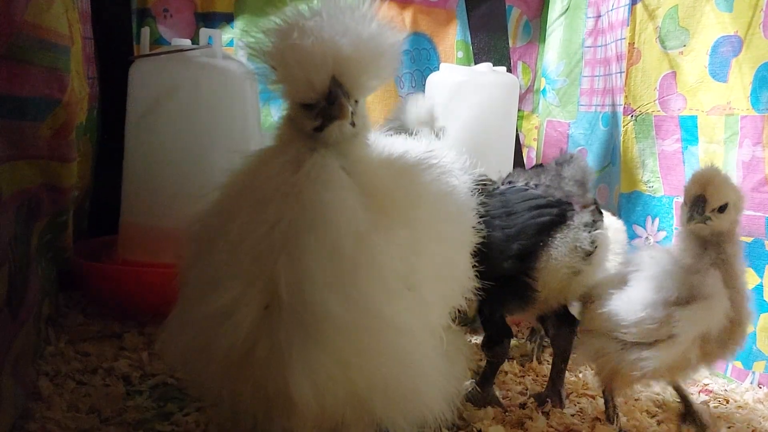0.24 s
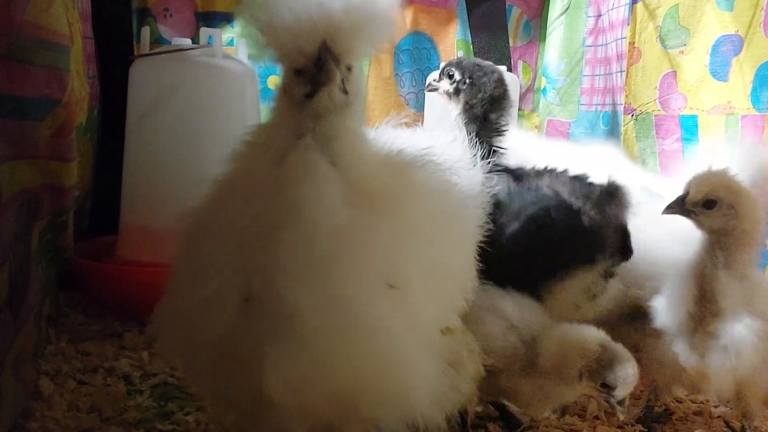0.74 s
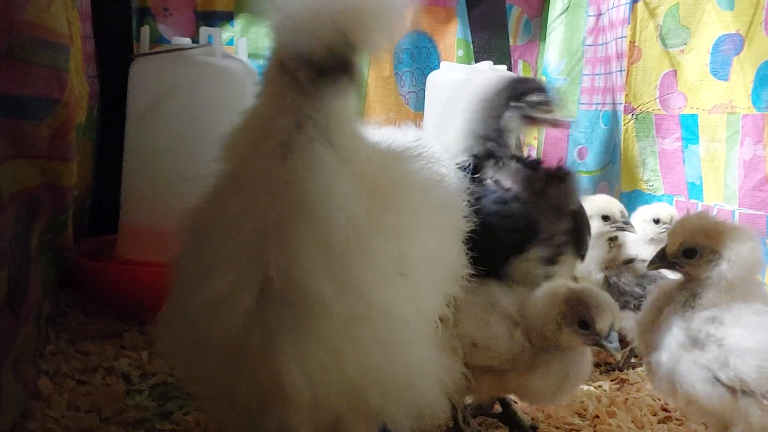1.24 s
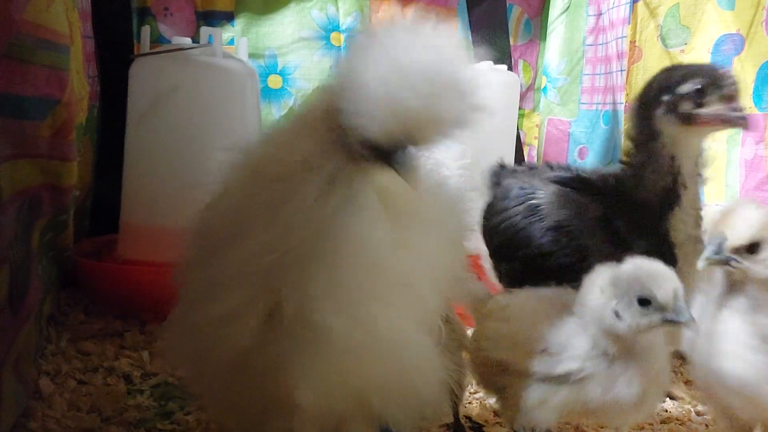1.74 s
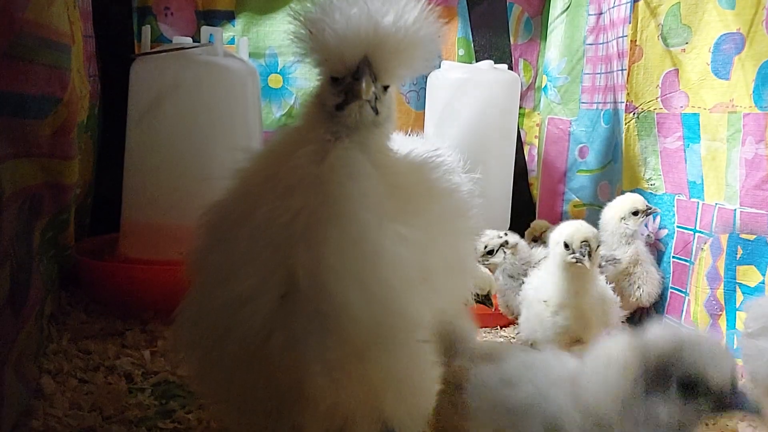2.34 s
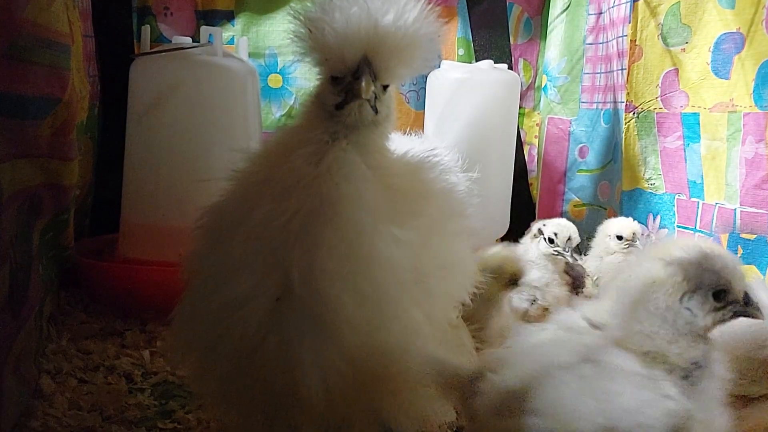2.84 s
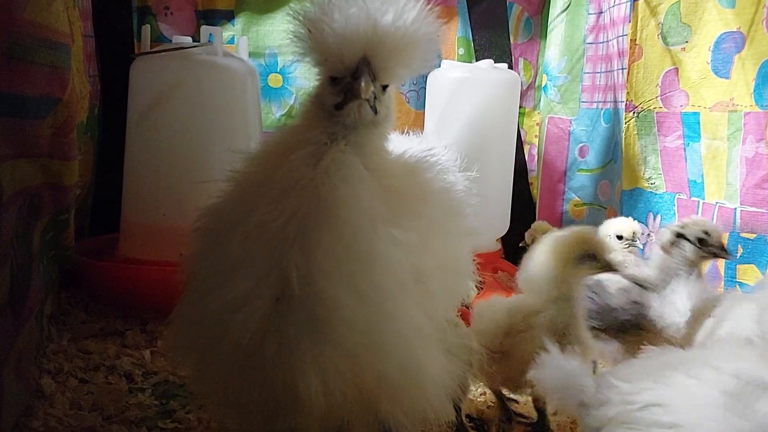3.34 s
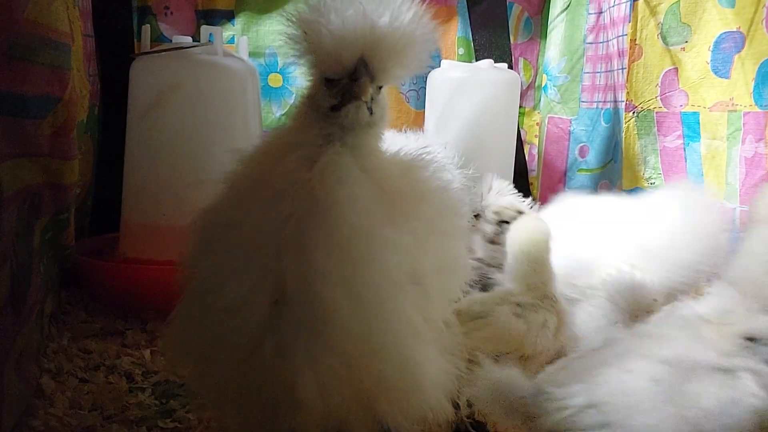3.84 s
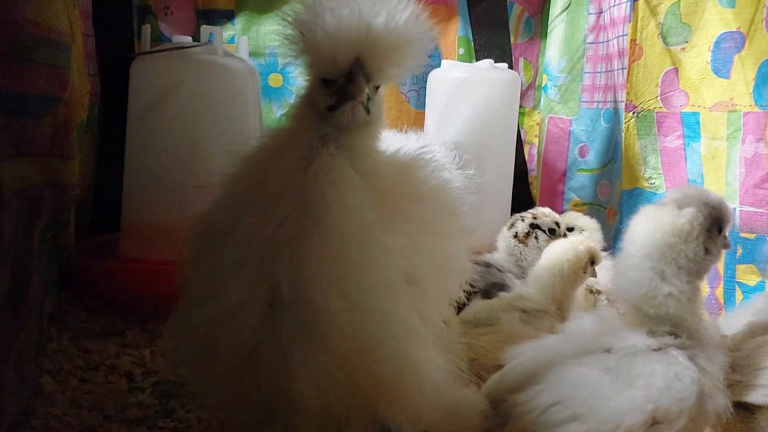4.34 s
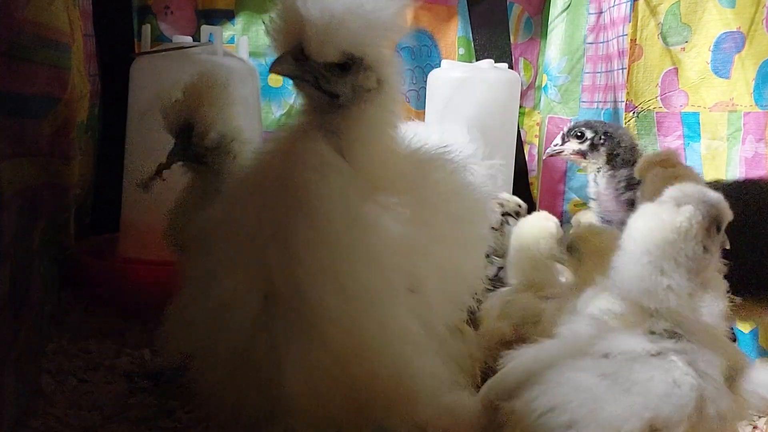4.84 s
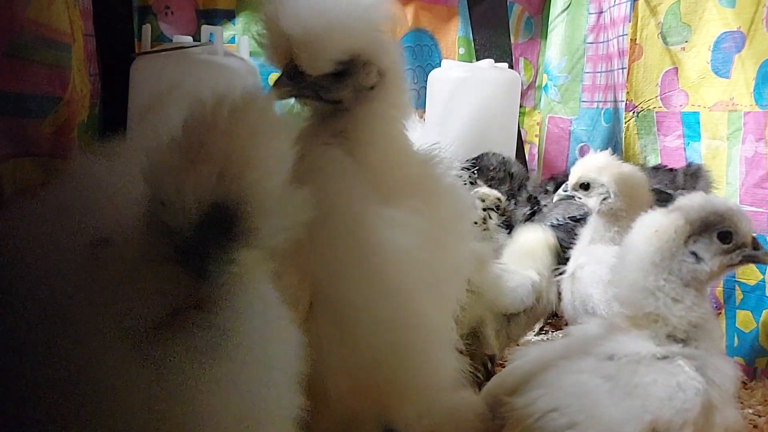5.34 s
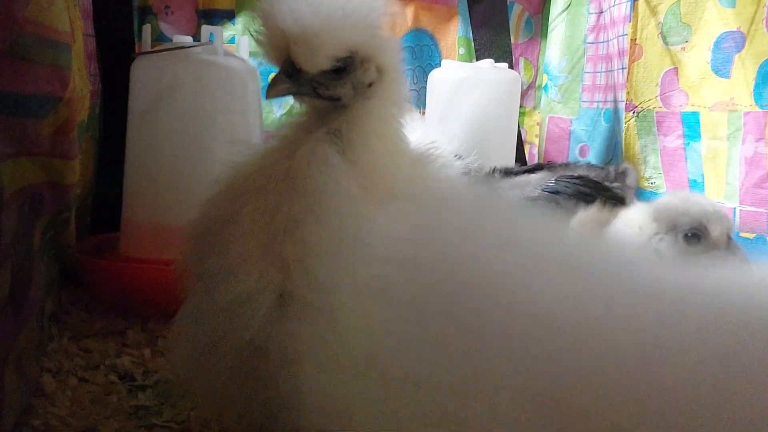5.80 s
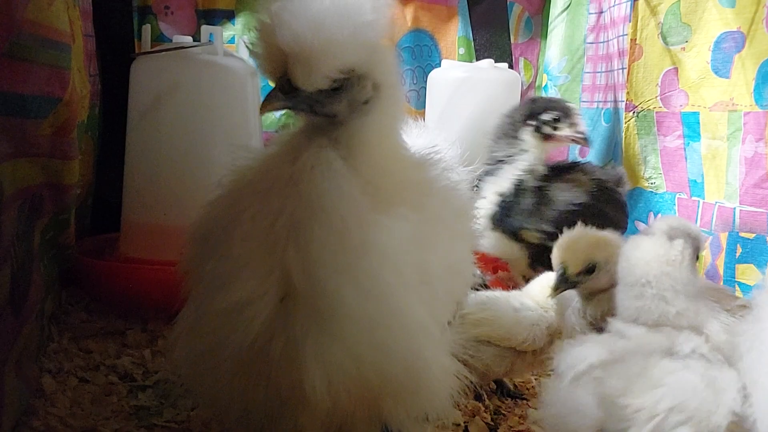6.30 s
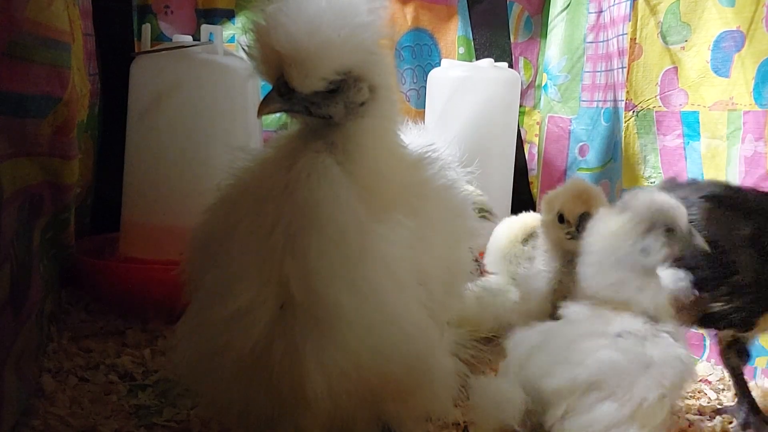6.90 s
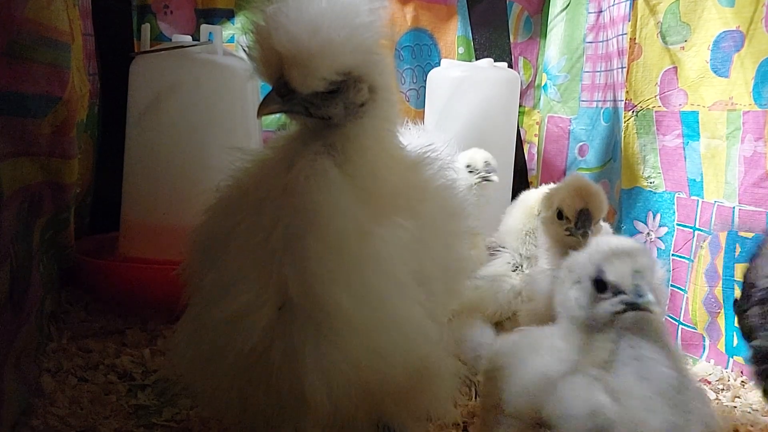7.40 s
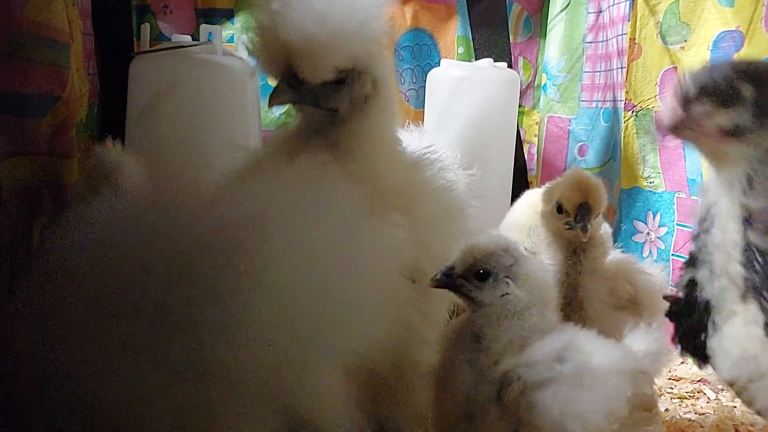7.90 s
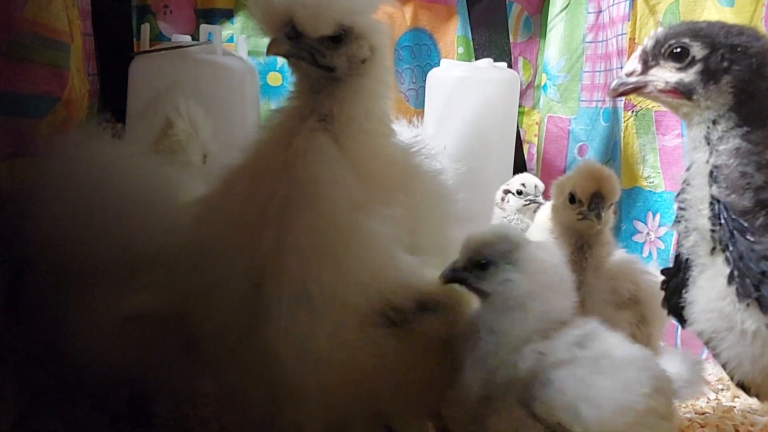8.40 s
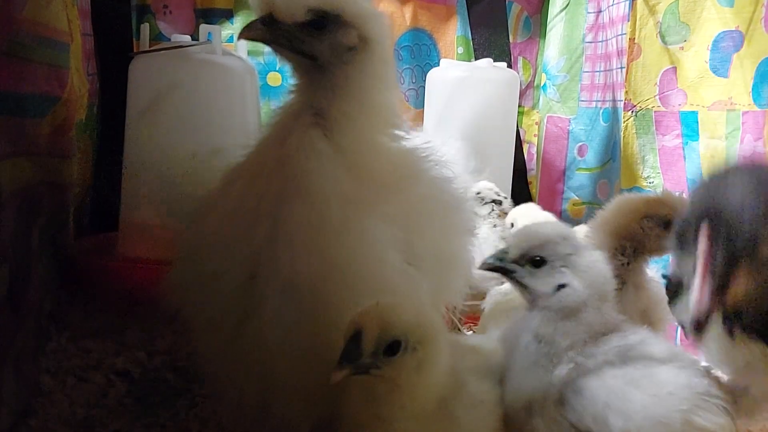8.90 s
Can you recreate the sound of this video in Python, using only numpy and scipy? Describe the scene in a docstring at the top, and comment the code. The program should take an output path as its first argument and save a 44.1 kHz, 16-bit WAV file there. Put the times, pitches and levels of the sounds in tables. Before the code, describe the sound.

A brood of chicks peeps and shuffles near the microphone in a cloth-walled pen with almost no echo. Low bumps and scratchy rustles of shavings run under the high calls, soon joined by an older chick's repeated raspy, falling cry. A few quick trills sound about halfway through. Late on the peeping stops for a moment, then comes back in a softer flurry around the last cry.

```python
"""A brood of chicks in a small cloth-walled pen bedded with wood shavings.
From the start, small chicks whistle arched peeps and soft chirps; feet thump, shavings and feathers rustle.
From 1 s an older chick repeats a hoarse falling cry that cracks downward at its end.
Four short trills come around 5 s, and the footfalls grow lighter. The peeps pause from 6.7 to 8 s,
then return in a quieter flurry around the last cry as the shuffling dies down."""
import sys
import numpy as np
from scipy import signal
from scipy.io import wavfile
from scipy.ndimage import uniform_filter1d

SR = 44100
rng = np.random.default_rng(int(sys.argv[2]) if len(sys.argv) > 2 else 0)


def unload_audio(sound):
    """Save the sound as a 16-bit wav file, at the path given as the first command line argument."""
    columns = np.transpose(np.atleast_2d(sound))
    # keep every value between -1 and 1, then stretch to whole-number steps
    steps = np.round(np.clip(columns, -1, 1) * 32767)
    wavfile.write(sys.argv[1], SR, steps.astype(np.int16))


N = 403515
TIME = np.arange(N) / SR


def from_db(db):
    return 10 ** (np.asarray(db) / 20)


def unit_rms(x):
    return x / np.sqrt(np.mean(x ** 2) + 1e-20)


def at_hz(points, hz):
    """Interpolate on a log-frequency axis."""
    points = np.array(points)
    return np.interp(np.log(hz), np.log(points[:, 0]), points[:, 1])


def bandpass(x, low_hz, high_hz, order):
    return signal.sosfilt(signal.butter(order, [low_hz, high_hz], "band", fs=SR, output="sos"), x)


def hiss_band(low_hz, high_hz, size):
    return unit_rms(bandpass(rng.standard_normal(size), low_hz, high_hz, order=4))


def drift(hz, size):
    """Random wander slower than hz, rms 1."""
    pole = np.exp(-2 * np.pi * hz / SR)
    run_in = SR // 12
    wander = signal.lfilter([1], [1, -2 * pole, pole * pole], rng.standard_normal(size + run_in))
    return unit_rms(wander[run_in:])


def glide(t, times, values, round_s):
    """Line segments with rounded corners."""
    return uniform_filter1d(np.interp(t, times, values), max(1, int(round_s * SR)), mode="nearest")


def fade(t, edge_s):
    """Sine-squared fade at both ends."""
    return np.sin(np.pi / 2 * np.clip(np.minimum(t - t[0], t[-1] - t) / edge_s, 0, 1)) ** 2


def add(out, start_s, sound, pan_db=0, delay_ms=0):
    """Mix into stereo. pan_db: left over right; delay_ms: lag of the right ear."""
    lean = from_db(pan_db)
    pair = np.array([lean * sound, sound]) * np.sqrt(2 / (1 + lean ** 2))
    left = max(0, round(start_s * SR))
    right = max(0, left + round(delay_ms * SR / 1000))
    for ear, at in enumerate((left, right)):
        out[ear, at:at + len(sound)] += pair[ear, :max(0, N - at)]


def pen_reverb(x, t60_s=.18):
    """Short diffuse tail from the soft walls, different at each ear."""
    t = np.arange(SR // 3) / SR
    tail = rng.standard_normal((2, len(t))) * from_db(-60 * t / t60_s) * (t > .003)
    tail = bandpass(tail, 300, 9000, order=1)
    tail = tail / np.sqrt(np.sum(tail ** 2, axis=1, keepdims=True))
    return signal.fftconvolve(x.mean(axis=0)[None], tail, axes=1)[:, :N]


def banded_noise(spectrum, flicker_db, flicker_hz):
    """Half-octave bands of stereo noise that flicker partly together; rms 1."""
    # left-right likeness: freq_hz, correlation
    likeness = [(50, 0.97), (150, 0.96), (300, 0.76), (800, 0), (3000, 0), (12000, 0.073)]
    out, together = 0, drift(flicker_hz, N)
    edges_hz = 22 * 2 ** np.arange(0, 9.6, .5)
    white = rng.standard_normal((2, 2, N))
    for k, (low_hz, high_hz) in enumerate(zip(edges_hz, edges_hz[1:])):
        hz = np.sqrt(low_hz * high_hz)
        if spectrum[0][0] / 2 < hz < spectrum[-1][0] * 2:
            mid, side = bandpass(white[k % 2], low_hz, high_hz, order=2)
            alike = at_hz(likeness, hz)
            gain = from_db(at_hz(spectrum, hz) + flicker_db * (together + .5 * drift(flicker_hz, N)))
            out = out + gain * (np.sqrt(1 + alike) * mid + np.sqrt(1 - alike) * side * [[1], [-1]])
    return unit_rms(out)


def floor_rumble(gain_db):
    """Many small shuffling feet keep the floor rumbling."""
    # rumble envelope: time_s, level_db
    envelope = [(0, -33.5), (0.6, -34.5), (1.3, -37.5), (2.0, -36), (2.7, -42), (3.2, -43.5), (4.3, -40),
                (5.2, -38.5), (6.15, -49.5), (6.95, -38.5), (7.2, -47.5), (7.5, -37), (8.1, -49.5),
                (9.15, -50)]
    # rumble spectrum: freq_hz, density_db
    spectrum = [(25, -33), (40, -16.5), (58, 9.5), (80, 1), (115, -0.5), (160, -5.5), (220, -10.5),
                (310, -22), (520, -23), (900, -28.5), (1600, -42), (4000, -67)]
    level = from_db(np.interp(TIME, *np.transpose(envelope)) + gain_db)
    return level * banded_noise(spectrum, flicker_db=4.0, flicker_hz=13.4)


def scratch_envelope(attack_s=.0063):
    """Each scratch in the shavings rises quickly and fades."""
    # scratches: peak_s, decay_s, level_db
    scratches = [(.87, .03, -53.5), (1.246, 0.02, -47.5), (1.638, 0.097, -48), (2.086, 0.019, -44.5),
                 (2.147, 0.013, -38), (2.232, 0.022, -48.5), (2.34, 0.015, -51), (2.412, 0.028, -48),
                 (2.56, 0.064, -49), (2.798, 0.065, -48), (3.215, 0.067, -65), (3.42, 0.04, -47.5),
                 (3.555, 0.0087, -59), (3.70, .025, -55), (4.599, 0.21, -53.5), (4.79, 0.035, -45.5),
                 (5.37, 0.0057, -54.5), (5.46, 0.064, -59.5), (5.954, 0.022, -53), (6.275, 0.021, -86.5),
                 (6.40, 0.09, -53), (6.647, 0.034, -44), (6.89, 0.049, -54.5), (7.459, 0.17, -51),
                 (7.723, 0.02, -55), (8.26, 0.041, -56.5), (8.489, 0.026, -56.5), (8.635, 0.034, -61.5)]
    t, power = np.arange(0, N / SR, .001), 0
    for peak_s, decay_s, db in scratches:
        falloff = np.maximum((peak_s - t) / attack_s, (t - peak_s) / decay_s)
        power = power + from_db(db) ** 2 * np.exp(-2 * falloff)
    return np.interp(TIME, t, np.sqrt(power))


def rustle(stir_db, scratch_db, crackle_db, ticks_per_s=110, tick_s=.0006):
    """Shavings and feathers hiss and tick as the birds stir and scratch."""
    # steady stirring: time_s, level_db
    envelope = [(0.0, -59), (0.51, -64.5), (1.53, -57.5), (2.75, -58.5), (3.06, -68), (3.36, -58),
                (4.87, -63), (5.09, -66), (5.53, -56.5), (6.14, -68), (6.62, -58), (7.21, -66), (7.57, -61),
                (7.85, -63.5), (7.95, -64), (9.15, -75)]
    # hiss spectrum: freq_hz, density_db
    spectrum = [(300, -5.5), (800, -2.5), (1600, -1), (3500, 1), (6000, 1), (8000, -4.5), (10000, -16),
                (12500, 2.5), (15500, 2.5)]
    hiss = banded_noise(spectrum, flicker_db=3.05, flicker_hz=34.7)
    snaps = (rng.random(N) < ticks_per_s / SR) * from_db(5 * np.minimum(rng.exponential(1, N), 3))
    decays = signal.lfilter([1], [1, -np.exp(-1 / (tick_s * SR))], snaps + 1e-18)
    ticks = unit_rms(decays * rng.standard_normal((2, N)))
    stir = from_db(np.interp(TIME, *np.transpose(envelope)) + stir_db)
    level = np.hypot(stir, from_db(scratch_db) * scratch_envelope())
    return level * (hiss + from_db(crackle_db) * ticks)


def footfalls(gain_db, crunch_db=-11, crunch_s=.013):
    """A foot sets the floor ringing, low modes building last, and crushes some shavings."""
    # steps: time_s, thud_db, knock_db, tap_db
    steps = [(0.183, -26, -35, -36.5), (.312, -41, -33, -35.5), (0.45, -25, -22, -32.5),
             (0.863, -18.5, -21.5, -43), (0.913, -22, -30.5, -39), (1.045, -18, -33, -52),
             (1.551, -20, -24, -50), (1.722, -26.5, -21.5, -38), (2.087, -18, -22.5, -28.5),
             (2.15, -18, -23, -41), (2.346, -18.5, -26, -50), (2.564, -19, -27, -43),
             (2.673, -14.5, -19, -37), (2.8, -23.5, -28, -52), (3.581, -20, -47, -35.5),
             (3.638, -17.5, -24, -32.5), (3.818, -18, -13.5, -38.5), (3.997, -31, -17, -41.5),
             (4.199, -16.5, -10, -25), (4.479, -64, -25, -92), (4.574, -43.5, -23, -46),
             (4.648, -17.5, -17, -23.5), (4.883, -36, -54, -31), (4.924, -42, -53, -30),
             (4.961, -28, -34, -48), (5.436, -28.5, -44, -38), (5.588, -33, -34.5, -28),
             (5.657, -27.5, -27, -52), (6.396, -21, -40, -58), (6.535, -19, -37.5, -52),
             (6.649, -21, -23, -47.5), (6.94, -29, -30.5, -35.5), (7.6, -51, -31.5, -38),
             (7.735, -36, -62, -57), (8.251, -26.5, -31, -46), (8.94, -29, -26.5, -27.5),
             (8.978, -36, -42, -38.5), (9.1, -57, -54.5, -47)]
    # thud, knock and tap bands: centre_hz
    bands_hz = [85, 230, 700]
    # pen floor modes: freq_hz, level_db, t60_s
    modes = [(64.9, -5.5, 0.36), (72, 0, 0.089), (114.8, 1.5, 0.12), (157, -7.5, 0.068), (217, 0, 0.084),
             (284, -10.5, 0.037), (390.5, -6, 0.086), (522, -6, 0.064), (686, -1.5, 0.047),
             (846, -4, 0.046), (1210, -7.5, 0.064)]
    out, t = np.zeros((2, N)), np.arange(SR // 4) / SR
    for time_s, thud_db, knock_db, tap_db in steps:
        start_s = time_s - .001
        force = list(zip(bands_hz, (thud_db, knock_db, tap_db)))
        for hz, db, t60_s in modes:
            mode_db = gain_db + db + at_hz(force, hz) + rng.normal(0, .44)
            age = t[t < t60_s]
            swing = np.sin(2 * np.pi * (hz * rng.normal(1, .043) * age + rng.random()))
            ring = from_db(mode_db - 60 * age / t60_s) * swing * (1 - np.exp(-2 * hz * age))
            pan_db, delay_ms = (5, .35) if hz > 250 else (1, 0)   # higher modes from the left
            add(out, start_s, ring, pan_db, delay_ms)
        age = t[t < 8 * crunch_s]
        for pan_db in (-12, 12):
            grains = rng.standard_normal(len(age)) * from_db(3 * drift(400, len(age)))
            crunch = 2 * bandpass(grains * np.exp(-age / crunch_s), 300, 1300, order=2)
            add(out, start_s, from_db(tap_db + crunch_db) * crunch, pan_db)
    return out


def syrinx(hz, overtones, overtone_db):
    """Vibrating membrane: nearly a sine, with weak overtones coloured by the beak."""
    # beak and throat response: freq_hz, gain_db
    beak = [(3000, 7), (4800, 6), (5800, 8), (7000, -3.5), (8000, -2.5), (9300, -2.5), (10500, -15),
            (12200, 3.5), (14500, -9)]
    phase = 2 * np.pi * np.cumsum(hz) / SR
    wave = np.sin(phase)
    for k, db in overtones:
        gain = from_db(db + overtone_db + at_hz(beak, k * hz)) * (k * hz < SR / 2)
        wave = wave + gain * np.sin(k * phase)
    return np.sqrt(2) * wave


def whistle(t, hz, db, overtone_db, jitter=.0007, shimmer_db=2.04, slack_jitter=.083, flutter_db=6):
    """Clear tone; as the pitch collapses, the slack membrane flutters and gains overtones."""
    # syrinx overtones: harmonic, level_db
    overtones = [(2, -34.5), (3, -64.5)]
    slack = np.clip((hz.max() - hz - 600) / 700, 0, 1) * (t > t[np.argmax(hz)])
    pitch_hz = hz * (1 + (jitter + slack_jitter * slack) * drift(300, len(t)))
    wave = syrinx(pitch_hz, overtones, overtone_db + 13 * slack)
    waver_db = shimmer_db * drift(73, len(t)) + flutter_db * slack * (drift(162, len(t)) / 2 - 1)
    return wave * from_db(db + waver_db - 2 * slack) * fade(t, .0016)


def chirps(gain_db):
    """Soft whistles that crest early and slide down."""
    # chirps: start_s, end_s, top_hz, last_hz, level_db, pan_db
    calls = [(0, 0.05, 2780, 2450, -51.5, 7), (0.295, 0.349, 4310, 3700, -45, 6),
             (0.778, 0.846, 4300, 3430, -52, 13), (0.947, 1.026, 2850, 2070, -50.5, 11),
             (0.967, 1.025, 4850, 4000, -53, 5), (1.318, 1.38, 2790, 2190, -48, -6),
             (1.83, 1.893, 2950, 2300, -57, 15), (2.006, 2.057, 3030, 2590, -39.5, 8),
             (3.914, 3.967, 3430, 2700, -46.5, 11), (4.056, 4.104, 3450, 2640, -44, 6),
             (5.752, 5.782, 3100, 2400, -53.5, 6), (8.083, 8.127, 3425, 2820, -61, 7)]
    out = np.zeros((2, N))
    for start_s, end_s, top_hz, last_hz, db, pan_db in calls:
        t = np.arange(start_s, end_s, 1 / SR)
        crest_s = start_s + (end_s - start_s) / 4
        hz = glide(t, [start_s, crest_s, end_s], [.94 * top_hz, top_hz, last_hz], round_s=.0056)
        wave = whistle(t, hz, gain_db + db, overtone_db=5, jitter=.017)
        add(out, start_s, wave * fade(t, .0058), pan_db)
    return out


def trills(warble_hz=43, depth_hz=560):
    """Whistles whose pitch bounces in quick arches with sharp troughs."""
    # trills: start_s, end_s, trough_s (sets the warble phase), first_hz, last_hz, level_db
    calls = [(4.626, 4.681, 4.638, 3110, 4270, -27), (4.71, 4.77, 5, 4350, 2910, -32.5),
             (4.908, 4.983, 3.7, 3420, 3880, -34), (5.093, 5.157, 5.123, 3530, 4230, -39.5)]
    out = np.zeros((2, N))
    for start_s, end_s, trough_s, first_hz, last_hz, db in calls:
        t = np.arange(start_s, end_s, 1 / SR)
        bounce = np.abs(np.sin(np.pi * warble_hz * (t - trough_s))) - 2 / np.pi
        hz = np.linspace(first_hz, last_hz, len(t)) + depth_hz * bounce
        wave = whistle(t, hz, db, overtone_db=14, jitter=.018, shimmer_db=2,
                       slack_jitter=.01, flutter_db=0)
        add(out, start_s, wave * fade(t, .01))
    return out


def peeps(gain_db, scoop_hz=1161, climb_hz_per_s=550, onset_db=-23, swell_db=5.5, fall_db=-11.5):
    """Each peep scoops up, climbs slowly and swells, then collapses; it wavers between the ears."""
    # near and far peeps: start_s, end_s, top_hz, last_hz, scoop_s, fall_s, level_db, pan_db, delay_ms
    calls = [(0, 0.168, 4760, 2580, 0.02, 0.016, -27.5, 4.5, 0.061),
             (0.149, 0.248, 4460, 4030, 0.013, 0.014, -42, 11, -0.057),
             (0.251, 0.297, 4830, 4280.0, 0.001, 0.015, -27, 1, 0.0),
             (0.321, 0.386, 4840, 2240.0, 0.011, 0.017, -35, -1, -0.072),
             (0.429, 0.526, 4640, 2230, 0.01, 0.018, -32, 1, 0.089),
             (0.438, 0.635, 4757, 2460, 0.024, 0.013, -27.5, 4, 0.035),
             (0.717, 0.826, 4720, 3670, 0.024, 0.0097, -27.5, 4.5, 0.075),
             (0.871, 0.992, 4650, 3820, 0.022, 0.027, -41, 9, -0.078),
             (1.013, 1.093, 4628, 3250, 0.0076, 0.023, -32.5, -2, -0.1),
             (1.068, 1.246, 4794, 2550, 0.014, 0.015, -28, 5, 0.04),
             (1.435, 1.535, 4597, 4030, 0.012, 0.021, -34.5, 10, -0.04),
             (1.464, 1.645, 4845, 3200, 0.015, 0.023, -28, -4.5, -0.01),
             (1.859, 2.026, 4767, 2820, 0.013, 0.014, -25, 4.5, 0.025),
             (2.335, 2.526, 4675, 2900, 0.02, 0.018, -30, 13, -0.0),
             (2.858, 3.062, 4714, 2550, 0.028, 0.019, -30.5, 8, -0.025),
             (3.845, 3.98, 4450, 2430, 0.01, 0.016, -31.7, 11, 0.062),
             (4.074, 4.183, 4833, 2920, 0.016, 0.017, -25, 11, 0.059),
             (4.512, 4.693, 4620, 2400, 0.021, 0.013, -26, 4, 0.044),
             (4.795, 4.903, 4965, 2850, 0.026, 0.019, -26.5, 0, 0.035),
             (5.157, 5.293, 4656, 4160, 0.014, 0.01, -28.5, -8, 0.068),
             (5.339, 5.443, 4846, 2640, 0.012, 0.014, -29.5, -2, 0.074),
             (5.658, 5.799, 4690, 2450, 0.011, 0.014, -28, -0.5, 0.037),
             (5.781, 5.855, 4809, 2270, 0.017, 0.016, -41, 3, -0.074),
             (5.924, 5.994, 4760, 2360, 0.011, 0.013, -36, 8, -0.084),
             (5.958, 6.104, 4760, 2610.0, 0.019, 0.012, -30, 4.5, 0.071),
             (6.37, 6.53, 4610, 2720, 0.022, 0.012, -35, 0, 0.076),
             (6.591, 6.67, 4460, 4100, 0.014, 0.021, -44, 6, -0.08),
             (8.027, 8.178, 4436, 2310, 0.024, 0.013, -43, -2, -0.063),
             (8.232, 8.326, 4760, 2070, 0.0043, 0.014, -31.5, 5, 0.068),
             (8.397, 8.491, 4450, 3520, 0.0085, 0.013, -30.5, -5, 0.099),
             (8.491, 8.581, 4830, 2360.0, 0.024, 0.018, -45.5, 7, -0.083),
             (8.62, 8.711, 4820, 2460, 0.013, 0.021, -43.5, 4, -0.078),
             (8.743, 8.895, 4260, 3710, 0.012, 0.013, -38.5, -11, -0.02),
             (8.783, 8.86, 5010, 2410, 0.018, 0.022, -41, 4, -0.024),
             (8.931, 8.969, 4910, 3330, 0.0061, 0.016, -35, 2, -0.008),
             (8.938, 9.033, 4430, 3750, 0.014, 0.012, -33, -0.5, -0.097)]
    out, attack_s = np.zeros((2, N)), .017
    for start_s, end_s, top_hz, last_hz, scoop_s, fall_s, db, pan_db, delay_ms in calls:
        t = np.arange(start_s, end_s, 1 / SR)
        age, remaining = t - start_s, end_s - t
        held_hz = top_hz - scoop_hz * np.exp(-age / scoop_s) - climb_hz_per_s * remaining
        fall = np.exp(-(remaining / fall_s) ** 2)
        hz = (held_hz + (last_hz - held_hz) * fall) * (1 + .002 * drift(30, len(t)))
        swell = np.linspace(-.5, .5, len(t))
        effort_db = onset_db * np.exp(-age / attack_s) + swell_db * swell + fall_db * fall
        wave = whistle(t, hz, gain_db + db + effort_db, overtone_db=10 + effort_db / 2)
        add(out, start_s, wave, pan_db + 2.5 * drift(13, len(t)), delay_ms)
    return out


def cry_voice(hz, apart, strain, cracked, split_hz=400, second_db=-2, rasp_db=-17):
    """Strain pulls the two sides of the syrinx apart; they lock into one reedy tone, then crack."""
    # syrinx overtones: harmonic, level_db
    overtones = [(2, -16), (3, -25), (4, -21), (5, -19)]
    wave, size = 0, len(hz)
    torn = apart * strain
    rough = np.maximum(torn, .7 * cracked)
    jitter = .025 * torn + .045 * cracked
    for offset, gain in ((-1 / 4, 1 - apart / 4), (3 / 4, from_db(second_db) * torn)):
        side_hz = (hz + offset * split_hz * torn) * (1 + jitter * drift(260, size))
        overtone_db = -1 - 8 * apart - 8 * cracked + 3 * drift(160, size)
        sway = from_db(3 * apart * drift(60, size))   # the sides lead by turns
        flutter = 1 + .45 * rough * drift(230, size)
        wave = wave + gain * sway * flutter * syrinx(side_hz, overtones, overtone_db)
    # irregular membrane closures spread a rasp around the tone
    return wave + from_db(rasp_db) * rough * hiss_band(1710, 5000, size)


def cries(crack_hz=2542, drop_s=.0073, drop_share=.66, bow_hz=130, air_db=-27):
    """A hoarse cry slides down and swells, locks, sinks and cracks; air hisses through the open beak."""
    # older chick: start_s, crack_s, end_s, locked_s, first_hz, lock_hz, last_hz, hold_exponent,
    # hoarse_db, locked_db, cracked_db, pan_db, cracked_pan_db, delay_ms
    calls = [(1.026, 1.15, 1.166, 0.041, 4350, 3366, 2180, 0.28, -33, -24, -36, 7.5, -11, 0.0073),
             (1.488, 1.665, 1.686, 0.038, 4630, 3270, 1730, 0.59, -32.5, -23.5, -27.5, -2, -7, -0.049),
             (2.439, 2.567, 2.586, 0.023, 4720, 2980, 1810, 0.5, -35, -35.5, -29.5, 6, -6, 0),
             (2.774, 2.964, 2.987, 0.041, 4460, 3250, 1500, 2.24, -37, -25.5, -22.5, 0.5, -9.5, -0.059),
             (3.263, 3.455, 3.481, .034, 4583, 2880, 1600, 1.4, -35, -43.5, -17.5, 7, 7, -0.072),
             (4.12, 4.209, 4.228, .023, 3700, 3060, 1470, 1.05, -34, -30.5, -25.5, 0, 13, -0.11),
             (4.749, 4.821, 4.846, 0.036, 3520, 3160, 1545, 1.1, -25, -23.5, -20, 8.5, 14, -.12),
             (5.417, 5.602, 5.618, 0.039, 4730, 3014, 1320, 1.52, -28.5, -22.5, -26, 11.5, 4, 0.13),
             (6.252, 6.479, 6.499, .065, 4350, 3300, 1475, 0.57, -35.5, -22.5, -29, 4, 1.5, 0.051),
             (6.649, 6.789, 6.82, 0.037, 4780, 3125, 1413, 3, -30.5, -23.5, -14.5, 5, -14, -0.028),
             (7.317, 7.536, 7.558, 0.058, 4400, 3180, 1345, 2.1, -33, -20.5, -19.5, 3.5, 4, 0.05),
             (8.17, 8.325, 8.342, 0.051, 4360, 3210, 1494, 1.5, -40, -28.5, -31.5, 6, 16, 0.052)]
    attack_s, swell_db, dip_db, release_db = .0066, 13.5, -3.5, -12.5
    out = np.zeros((2, N))
    for (start_s, crack_s, end_s, locked_s, first_hz, lock_hz, last_hz, hold_exponent,
         hoarse_db, locked_db, cracked_db, pan_db, cracked_pan_db, delay_ms) in calls:
        t = np.arange(start_s, end_s + .0014, 1 / SR)
        lock_s, low_s = crack_s - locked_s, crack_s + drop_s
        slide = np.clip((t - start_s) / (lock_s - start_s), 0, 1)
        apart = np.clip((lock_s + .0044 - t) / .0095, 0, 1)
        cracked = np.clip((t - crack_s) / .0018, 0, 1)
        strain = np.clip(.4 + slide, 0, 1)

        low_hz = crack_hz + drop_share * (last_hz - crack_hz)
        hz = glide(t, [lock_s, crack_s, low_s, end_s], [lock_hz, crack_hz, low_hz, last_hz], .0046)
        hz += (first_hz - lock_hz) * (1 - slide ** hold_exponent)
        hz += bow_hz * np.sin(np.pi * np.clip((t - lock_s) / locked_s, 0, 1))
        hz *= 1 + .00848 * drift(35, len(t))

        db = glide(t, [start_s, lock_s, crack_s - drop_s, crack_s, low_s, end_s],
                   [hoarse_db - swell_db, hoarse_db, locked_db, locked_db + dip_db,
                    cracked_db, cracked_db + release_db], round_s=.012)
        envelope = from_db(db) * (1 - np.exp((start_s - t) / attack_s)) * fade(t, .0047)
        voice = cry_voice(hz, apart, strain, cracked)
        air = from_db(air_db) * (1 - cracked) * hiss_band(12200, 15500, len(t))
        moving_pan_db = pan_db + (cracked_pan_db - pan_db) * cracked
        add(out, start_s, (voice + air) * envelope, moving_pan_db, delay_ms)
    return out


def scene():
    """Calls and footfalls with the pen's reverb, over rumble and rustle."""
    direct = peeps(gain_db=-.5) + chirps(gain_db=1.5) + trills() + cries() + footfalls(gain_db=-1)
    reverb = from_db(-21) * pen_reverb(direct)
    shuffling = floor_rumble(gain_db=-.5) + rustle(stir_db=5, scratch_db=7.5, crackle_db=-9)
    return direct + reverb + shuffling


def record(dry):
    """The microphone sheds the deepest bass; the top is cut steeply."""
    low_hz, high_hz = 36, 15900
    thinned = signal.sosfilt(signal.butter(2, low_hz, "high", fs=SR, output="sos"), dry)
    return signal.sosfilt(signal.ellip(10, .1, 80, high_hz, fs=SR, output="sos"), thinned)


dry = scene()
out = record(dry)
unload_audio(out)
```